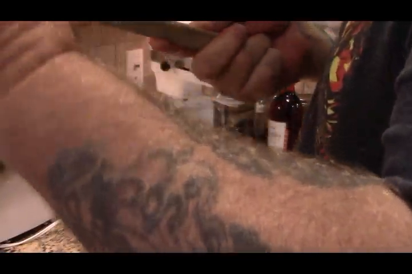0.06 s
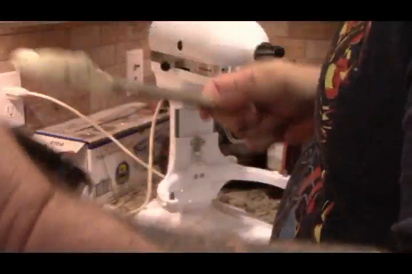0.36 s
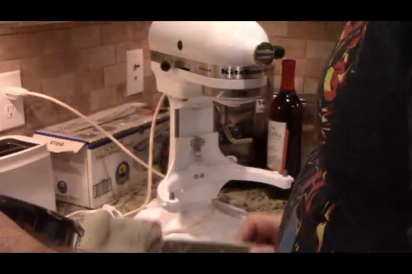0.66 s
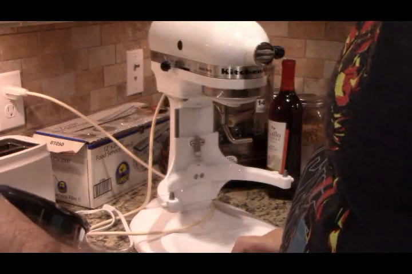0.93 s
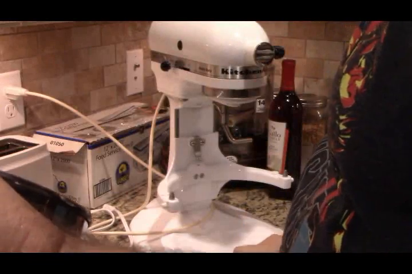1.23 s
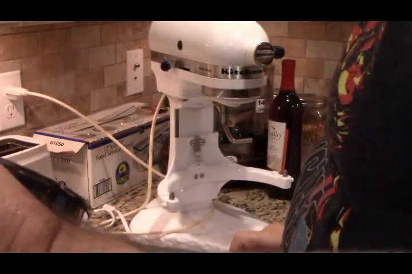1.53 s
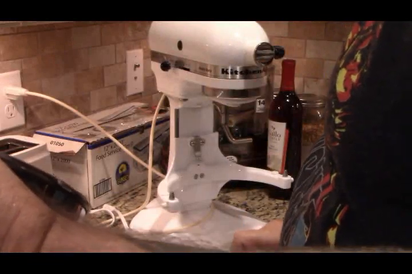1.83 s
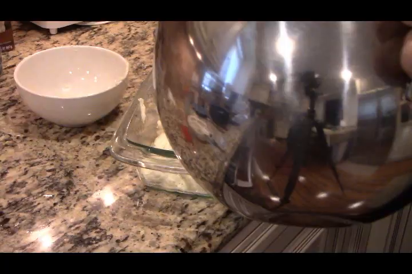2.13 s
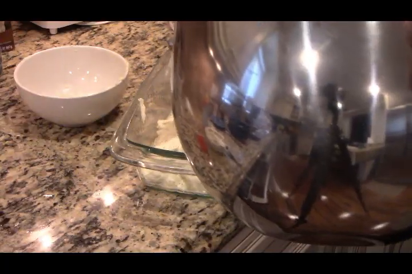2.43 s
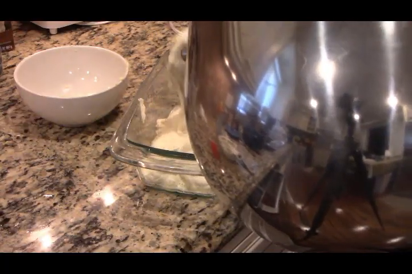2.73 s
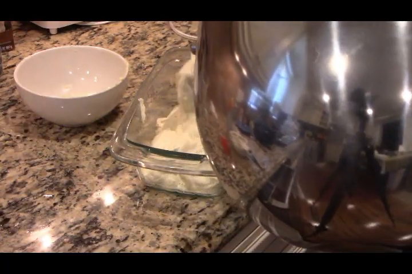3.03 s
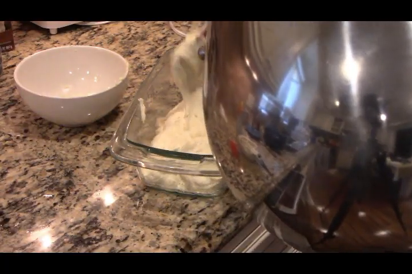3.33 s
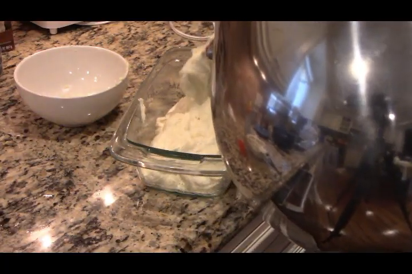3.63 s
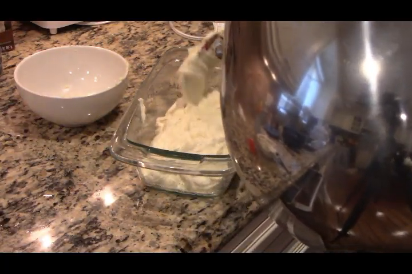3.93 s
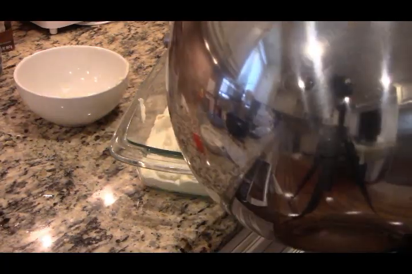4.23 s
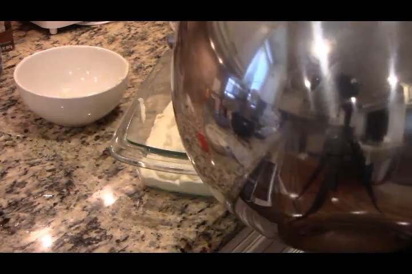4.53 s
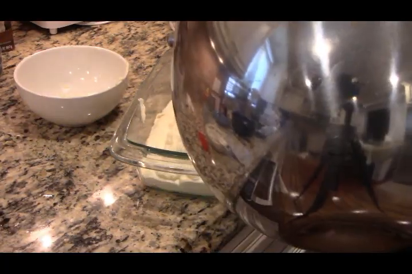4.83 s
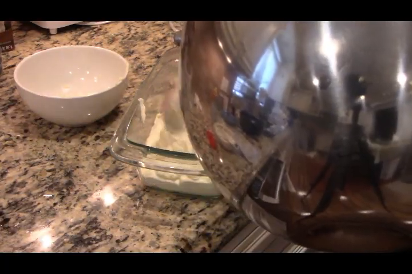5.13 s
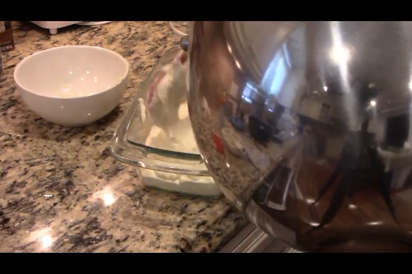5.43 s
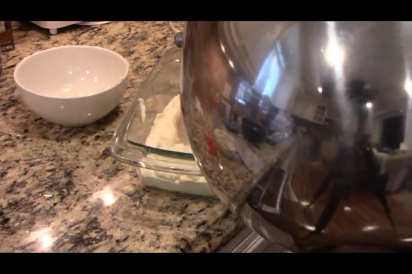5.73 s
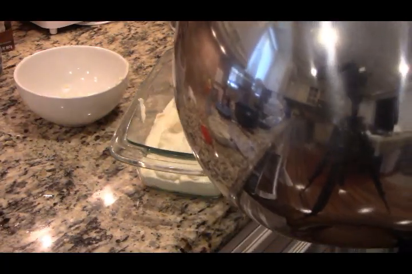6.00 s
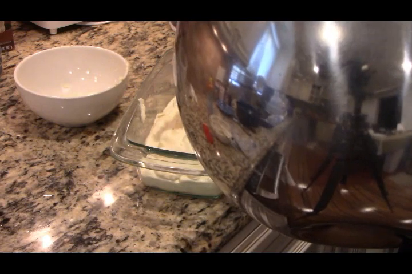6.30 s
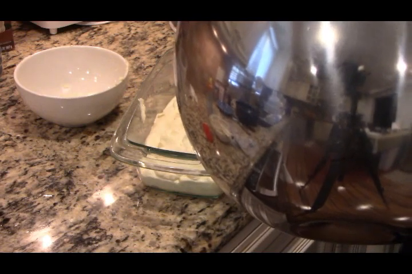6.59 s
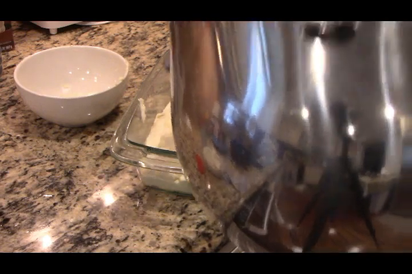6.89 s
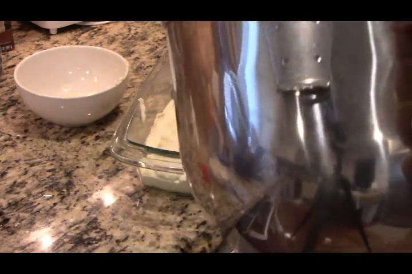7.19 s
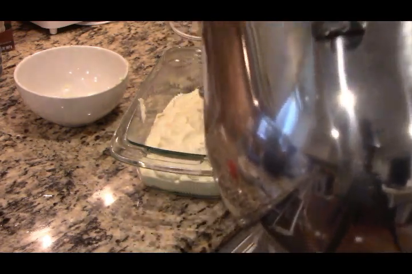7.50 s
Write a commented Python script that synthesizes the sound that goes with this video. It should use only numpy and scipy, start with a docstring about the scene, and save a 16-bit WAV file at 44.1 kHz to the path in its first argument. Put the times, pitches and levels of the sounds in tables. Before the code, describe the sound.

Close by in a small kitchen, over steady room noise and a faint appliance hum, a steel bowl rings under six loud, rapid spatula knocks. Quieter, muffled bumps follow at irregular intervals as the spatula works batter off the bowl's wall, with barely audible smearing and occasional sticky snaps. Near the end the bowl gives one loud, hollow metallic clunk with a brief chatter.

```python
"""Six knocks, each a padded thud and then a bright metal clang, close by in a small kitchen:
a batter-laden spatula hits the rim of a steel mixing bowl, head first, then shaft.
It then bumps softly round the bowl, scraping batter into a dish with a faint hiss and wet snaps.
A hard clunk ends it. An appliance hums throughout; a limiter flattens the loud blows."""
import sys
import numpy as np
from scipy import signal
from scipy.fft import rfft, irfft
from scipy.io import wavfile
from scipy.ndimage import uniform_filter1d, minimum_filter1d

SR = 44100
rng = np.random.default_rng(int(sys.argv[2]) if len(sys.argv) > 2 else 0)


def unload_wav(signal):
    """Save mono or channel-first audio to the path in sys.argv[1] as 16-bit WAV at rate SR, clipped to [-1, 1]."""
    wavfile.write(
        sys.argv[1],
        SR,
        np.round(np.clip(np.atleast_2d(signal).T, -1, 1) * 32767).astype(np.int16),
    )


N = 332955
HIT_SAMPLES = 2 ** 15
AGE_S = np.arange(HIT_SAMPLES) / SR
TIME_S = np.arange(N) / SR

# All levels are relative.
# room noise: freq_hz, density_db
AIR_SPECTRUM = [(15, -66), (25, -26), (87, -20.5), (107, -18.5), (241, -3.5), (325, -6.5), (425, -2),
                (461, -8), (655, -8), (857, -9), (930, -12.5), (1090, -13), (1220, -12), (7630, -39),
                (15800, -51)]
# appliance: pitch_hz, level_db
HUM_TONES = [(120, -54.5), (163, -57.5), (201, -51), (240, -50.5), (322, -54.5), (462, -55), (753, -60.5),
             (873, -59.5), (1063, -58)]
# reverberation: freq_hz, t60_s
KITCHEN_DECAY = [(100, 0.27), (400, 0.34), (1200, 0.33), (3000, 0.26), (6000, 0.24), (14000, 0.21)]
# left-right difference: freq_hz, gain_db
SIDE_SPECTRUM = [(40, -12), (150, -25.5), (400, -20.5), (1200, -17), (3000, -15), (6000, -11.5),
                 (14000, -28)]
# spatula along the wall: middle_s, length_s, level_db
STROKES = [(2.268, .14, -72), (2.68, 0.2, -70), (3.13, 0.18, -69), (4.08, .55, -70), (4.63, 0.13, -71),
           (5.75, 1.0, -68.5), (7.03, .25, -69)]
# batter hiss: freq_hz, gain_db
SMEAR_SPECTRUM = [(1000, 0), (3500, -18), (5800, 9), (9000, -2), (14000, -32)]
# air pockets: start_s, level_db, centre_hz, width_octaves
SNAPS = [(0.228, -51.5, 7000, 1.1), (2.861, -43, 3000, 1.7), (3.542, -60, 4470, .8), (4.86, -40, 3950, 1.5),
         (7.073, -51.5, 4500, 1.0), (7.116, -64, 10000, .25)]
# spatula on the inside wall: start_s, level_db, treble_db
BUMPS = [(2.171, -29.5, -31), (2.527, -31, -15), (2.623, -27, -27), (2.859, -34.5, -21), (2.984, -31, -28),
         (3.147, -24.5, -24), (3.245, -23.5, -28), (3.595, -27, -25), (3.661, -30, -31), (3.94, -27.5, -28),
         (4.344, -29.5, -11), (4.454, -21, -29), (4.793, -27.5, -42), (5.323, -22, -28),
         (5.364, -27.5, -39), (5.587, -20, -29)]
# wall response against the rim's: freq_hz, gain_db
WALL_SPECTRUM = [(200, -1), (500, 1.5), (900, 3.5), (1100, 1.5), (1210, 0), (1400, 4), (1700, .5),
                 (2600, -1), (3200, 3)]
# clunk, chatter and rebound: start_s, clatter_db, ring_db
CLUNK_HITS = [(7.274, 1, 0.5), (7.279, -4.5, -11.5), (7.323, -7.5, -19), (7.3642, -23, -16)]
# clunk's ring: pitch_hz, level_db, t60_s
CLUNK_MODES = [(112, -15, .3), (377, -1, .35), (400, -1, .36), (442, -4, .32), (1192, -6, .27),
               (1497, -11, .22), (1830, -18, .27), (2702, -17, .27), (3117, -20, .2), (3618, -20, .27),
               (3790, -15, .25), (4285, -23, .24), (6180, -27, .2)]
# clunk's clatter: freq_hz, density_db
CLUNK_SPECTRUM = [(40, -39), (120, -36), (250, 2.5), (420, 13), (700, -3.5), (1450, -1.5), (2200, -13),
                  (2800, -9.5), (3800, -8), (4600, -14), (5600, -12.5), (9000, -22.5), (11000, -41),
                  (15000, -57)]
# steel bowl, undamped by hand or batter: pitch_hz, padded_db, bare_db, t60_s
BOWL_MODES = [(232.8, -4.5, -12, 0.33), (377.6, 3, -17, 0.49), (440, 3.5, -15.5, 0.33),
              (540.6, -2, -5, 0.27), (727, -3, -14, .3), (818, -3.5, -2.5, 0.31), (926, -5, -14, 0.51),
              (1004, -4, -18, 0.44), (1123.5, 5, -5, 0.17), (1210, 7, -3, .33), (1480, -9, -10, .27),
              (1587, -4, -3, .3), (1648, -3, -1, .37), (2591, 0, 7, .18), (3004, -18, -1.5, .28),
              (3159, -11, 2, .26), (3450, -11, -5, .27), (4350, -20, -17, .25), (4540, -20, -25, .2),
              (5045, -26, -15, .2), (5880, -30, -21, .25), (6066, -24.5, -21, 0.27),
              (6550, -23, -30.5, 0.13), (7105, -31, -27, 0.16), (7680, -31, -21.5, 0.14),
              (7770, -44, -27.5, 0.28), (8220, -44, -32, 0.19), (8765, -43, -35, .2),
              (9560, -38, -26, 0.11), (10200, -45.5, -33, 0.16)]
# clatter of a padded blow: freq_hz, density_db
THUD_SPECTRUM = [(40, -51.5), (120, -10.5), (230, -3.5), (400, 3.5), (650, -8), (950, -11.5), (1180, 6.5),
                 (1380, -14.5), (1650, 1.5), (1950, -14), (3500, -22), (6000, -35.5), (9000, -47),
                 (15000, -58)]
# clatter of a bare blow: freq_hz, density_db
CLANG_SPECTRUM = [(40, -32), (120, -17.5), (230, -9.5), (450, -3), (1100, 0), (1750, -5.5), (2200, -11.5),
                  (2900, -11.5), (3800, -24), (5600, -26.5), (6600, -37), (9700, -41), (11500, -51),
                  (15000, -82)]
# spatula on the rim: head_s, head_db, head_hardness, shaft_s, shaft_ring_db
KNOCKS = [(.8261, -7, 0.13, .8527, 0.5), (1.0899, -11, 0.055, 1.107, -0.5), (1.2626, -8, 0.38, 1.282, -2.5),
          (1.4394, -8.5, 0.035, 1.4708, 4), (1.6211, -6, 0.083, 1.648, 3.5), (1.8022, -5, 0.19, 1.825, -1)]


def amp(db):
    return 10 ** (np.asarray(db) / 20)


def unit_rms(x):
    return x / np.sqrt(np.mean(x ** 2) + 1e-20)


def unit_hit(x):
    """Scales a blow to the energy of 10 ms at rms 1."""
    return x / np.sqrt(np.sum(x ** 2) * 100 / SR + 1e-20)


def curve_at(points, hz):
    knots_hz, values = np.transpose(points)
    return np.interp(np.log(hz + 1), np.log(knots_hz), values)


def bins_hz(size=HIT_SAMPLES):
    return np.fft.rfftfreq(size, 1 / SR)


def add(mix, start_s, sound):
    part = mix[round(start_s * SR):][:len(sound)]
    part += sound[:len(part)]


def colour(x, gain_db):
    """Minimum-phase filter, one gain per bin."""
    cepstrum = irfft(np.log(amp(np.maximum(gain_db, -100))))
    cepstrum[1:HIT_SAMPLES // 2] *= 2
    cepstrum[HIT_SAMPLES // 2 + 1:] = 0
    return irfft(rfft(x) * np.exp(rfft(cepstrum)))


def room_noise():
    """Steady air noise and the slightly wavering hum of an appliance."""
    air = unit_rms(irfft(rfft(rng.standard_normal(N)) * amp(curve_at(AIR_SPECTRUM, bins_hz(N))), N))
    knots_s = np.linspace(0, N / SR, num=40)
    hum = np.zeros(N)
    for pitch_hz, level_db in HUM_TONES:
        waver_rad = .11 * np.interp(TIME_S, knots_s, rng.standard_normal(len(knots_s)))
        hum += amp(level_db) * np.sin(2 * np.pi * pitch_hz * TIME_S + waver_rad)
    return amp(-47) * air + hum


def kitchen_tail():
    """Noise dying in each band at the room's rate."""
    hz, age_s, spectra = signal.stft(rng.standard_normal(HIT_SAMPLES), SR, nperseg=256)
    fade = np.exp(-np.log(1000) * age_s / curve_at(KITCHEN_DECAY, hz)[:, None])
    return signal.istft(spectra * fade, SR, nperseg=256)[1][:HIT_SAMPLES]


def clatter(shape_db, crack_s, tail_db):
    """A short crack of crowded modes, then its scatter off counter and walls."""
    crack = unit_hit(rng.standard_normal(HIT_SAMPLES) * np.exp(-AGE_S / crack_s))
    tail = unit_hit(kitchen_tail() * (1 - np.exp(-AGE_S / .0022)))
    return unit_hit(colour(crack + amp(tail_db) * tail, shape_db))


def ring(modes, scatter_db):
    """Damped modes weighted by the strike point; an imperfect shape splits each into a beating pair."""
    hz, level_db, t60_s = np.transpose(modes)[:, :, None]
    weight, polarity, split, phase_cycles = rng.standard_normal((4, len(modes), 1))
    gains = amp(level_db + scatter_db * weight) * np.sign(polarity)
    twin_hz = hz + 14 * np.sign(split) + 5 * split
    twins = .25 * np.sin(2 * np.pi * (twin_hz * AGE_S + phase_cycles))
    waves = (np.sin(2 * np.pi * hz * AGE_S) + twins) * np.exp(-np.log(1000) * AGE_S / t60_s)
    contact = 1 + .7 * np.exp(-AGE_S / .0177)  # faster decay while the striker touches
    attack = 1 - np.exp(-AGE_S / .0018)
    return unit_hit((gains * waves).sum(0) * contact * attack)


def shell_ripple_db(depth_db):
    """Narrow peaks and dips from a shell's crowded high resonances."""
    hz = bins_hz()
    ripple = uniform_filter1d(rng.standard_normal(len(hz)), size=48)
    ripple = unit_rms(uniform_filter1d(ripple, size=30))
    return depth_db * np.tanh(ripple) * np.clip(hz / 3000 - .5, 0, 1)


def bowl_modes(hardness, t60_scale, pitch_scale=1):
    """The bowl's modes for a contact of hardness 0 (padded) to 1 (bare metal)."""
    hz, padded_db, bare_db, t60_s = np.transpose(BOWL_MODES)
    level_db = padded_db + hardness * (bare_db - padded_db)
    return np.transpose([hz * pitch_scale, level_db, t60_s * t60_scale])


def batter_smear():
    """Tiny sticky grains hiss under the spatula; each stroke swells and fades."""
    grains = rng.standard_normal(N) * amp(2.4 * np.minimum(rng.exponential(1, N), 5))
    hiss = unit_rms(irfft(rfft(grains) * amp(curve_at(SMEAR_SPECTRUM, bins_hz(N))), N))
    pressure = sum(amp(level_db) * np.cos(np.pi * np.clip((TIME_S - middle_s) / length_s, -.5, .5)) ** 2
                   for middle_s, length_s, level_db in STROKES)
    return hiss * pressure


def batter_snaps(pocket_db=4.5, pocket_width_hz=200):
    """Air pockets burst and resonate as the batter pulls away."""
    out, hz = np.zeros(N), bins_hz()
    for start_s, level_db, centre_hz, width_octaves in SNAPS:
        offset = np.log2((hz + 1) / centre_hz) / width_octaves
        band_db = -22 * np.log10(1 + offset ** 2) - 8 * (hz / 12000) ** 2
        resonance_db = pocket_db / (1 + ((hz - centre_hz) / pocket_width_hz) ** 2)
        add(out, start_s, amp(level_db) * clatter(band_db + resonance_db, crack_s=.0057, tail_db=-4))
    return out


def wall_bump(edge_hz):
    """Batter cushions the spatula, flattens the bowl's pitch and shortens its ring."""
    hz = bins_hz()
    cushion_db = -10 * np.log10(1 + (hz / edge_hz) ** 4)
    thud = clatter(curve_at(THUD_SPECTRUM, hz), crack_s=.0017, tail_db=2.5)
    ringing = ring(bowl_modes(hardness=0, t60_scale=.8, pitch_scale=.988), scatter_db=1)
    return unit_hit(colour(thud + amp(5) * ringing, cushion_db + curve_at(WALL_SPECTRUM, hz)))


def wall_bumps(usual_edge_hz=1610, usual_treble_db=-27, db_per_octave=18):
    """The spatula meets the wall, brighter where batter is thin, then settles with a dull nudge."""
    out = np.zeros(N)
    for start_s, level_db, treble_db in BUMPS:
        edge_hz = usual_edge_hz * 2 ** ((treble_db - usual_treble_db) / db_per_octave)
        strength = amp(level_db - 4.5)
        add(out, start_s, strength * wall_bump(edge_hz))
        settle_s = start_s + rng.uniform(.04, .1)
        add(out, settle_s, strength * amp(-14.5) * wall_bump(edge_hz=890))
    return out


def clunk(bass_edge_hz=100, tick_hz=8000):
    """A hard, hollow blow that chatters, fills the room and grazes with a thin tick on the rebound."""
    out, hz = np.zeros(N), bins_hz()
    shape_db = curve_at(CLUNK_SPECTRUM, hz) + shell_ripple_db(depth_db=3.5)
    radiation_db = -10 * np.log10(1 + (bass_edge_hz / (hz + 1)) ** 6)
    for start_s, clatter_db, ring_db in CLUNK_HITS:
        body = clatter(shape_db, crack_s=.0082, tail_db=0)
        ringing = colour(ring(CLUNK_MODES, scatter_db=0), radiation_db)
        add(out, start_s, amp(clatter_db) * body + amp(ring_db) * ringing)
    rebound_s = CLUNK_HITS[-1][0]
    tick_shape_db = -20 * np.log2((hz + 1) / tick_hz) ** 2
    add(out, rebound_s, amp(-38.5) * clatter(tick_shape_db, crack_s=.0011, tail_db=-19))
    return out


def rim_blow(hardness, ring_db, shell_db):
    """One rim contact: hardness turns thud into clang; the holding hand damps the ring slightly."""
    hz, hardness = bins_hz(), np.clip(hardness, 0, 1)
    thud = clatter(curve_at(THUD_SPECTRUM, hz) + shell_db, crack_s=.0086, tail_db=-1)
    clang = clatter(curve_at(CLANG_SPECTRUM, hz) + shell_db, crack_s=.0058, tail_db=9)
    ringing = ring(bowl_modes(hardness, t60_scale=.97), scatter_db=1)
    return (1 - hardness) * thud + hardness * clang + amp(ring_db) * ringing


def rim_knocks(head_ring_db=-1.5, shaft_db=-5):
    """The padded head lands first, then the shaft strikes the rim, equally strongly each time."""
    out = np.zeros(N)
    shell_db = shell_ripple_db(depth_db=6)
    for k, (head_s, head_db, head_hardness, shaft_s, shaft_ring_db) in enumerate(KNOCKS):
        shaft_hardness = .71 + .09 * k  # knocks shake batter off the shaft
        add(out, head_s, amp(head_db) * rim_blow(head_hardness, head_ring_db, shell_db))
        add(out, shaft_s, amp(shaft_db) * rim_blow(shaft_hardness, shaft_ring_db, shell_db))
    return out


def scene():
    """Two close microphone ports differ in their reflections; the left is slightly louder."""
    mid = rim_knocks() + wall_bumps() + batter_snaps() + clunk() + batter_smear() + room_noise()
    reflections = rng.standard_normal(HIT_SAMPLES) * np.exp(-AGE_S / .004) * (AGE_S > .001)
    reflections /= np.linalg.norm(reflections)
    side_response = colour(reflections, curve_at(SIDE_SPECTRUM, bins_hz()))
    side = signal.oaconvolve(mid, side_response)[:N]
    return np.array([mid + side, mid - side]) * amp(db=[[.2], [-.2]])


def limit(x, threshold_db, recovery_db_per_s):
    """Fast limiter: the gain drops just ahead of each peak, then recovers steadily."""
    peak_db = 20 * np.log10(abs(x).max(0) + 1e-9)
    ramp_db = TIME_S * recovery_db_per_s
    held_db = np.maximum.accumulate(peak_db + ramp_db) - ramp_db
    over_db = np.maximum(held_db - threshold_db, 0)
    return x * amp(uniform_filter1d(minimum_filter1d(-over_db, size=12), size=52))


def record(dry):
    """Limiter, soft overload on what slips past, rumble filter and band limit."""
    limited = limit(dry, threshold_db=-.5, recovery_db_per_s=110)
    clipped = limited / (1 + limited ** 8) ** (1 / 8)
    highpass = signal.butter(2, 42, "highpass", fs=SR, output="sos")
    lowpass = signal.firwin(511, cutoff=15700, window=("kaiser", 9), fs=SR)
    return signal.oaconvolve(signal.sosfilt(highpass, clipped), lowpass[None], "same")


dry = scene()
out = record(dry)
unload_wav(out)
```